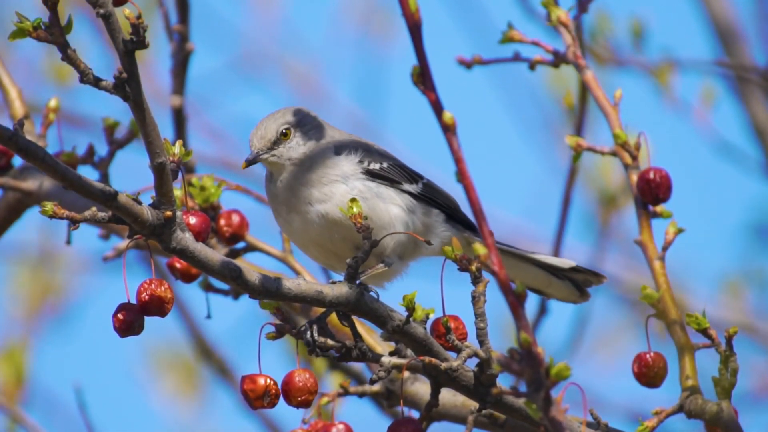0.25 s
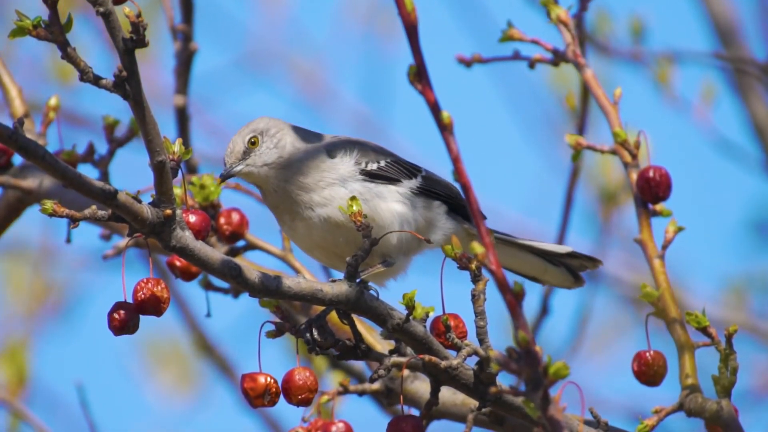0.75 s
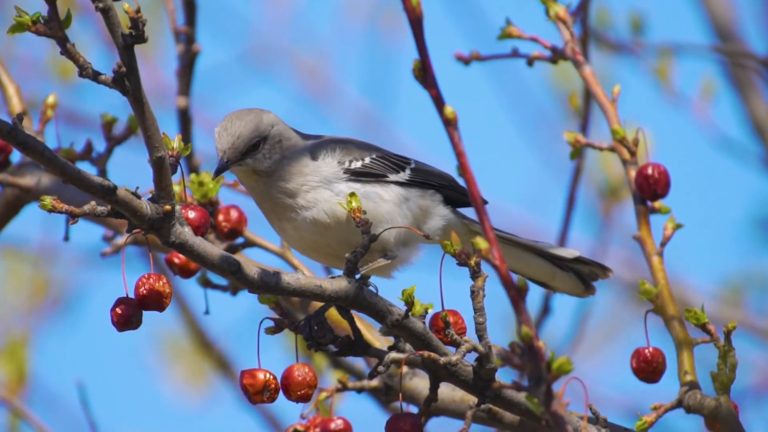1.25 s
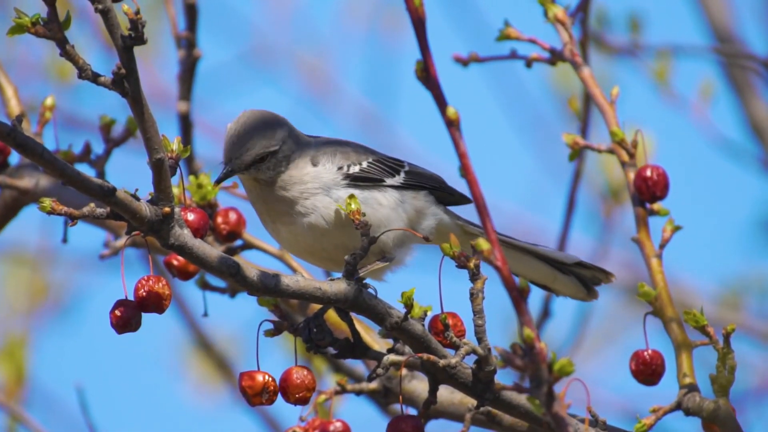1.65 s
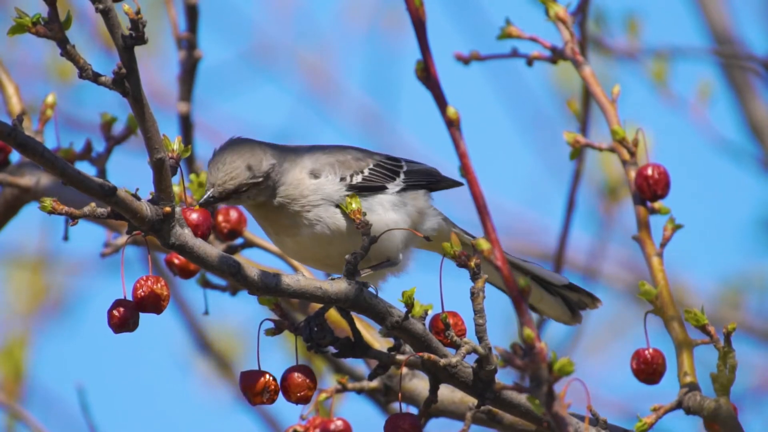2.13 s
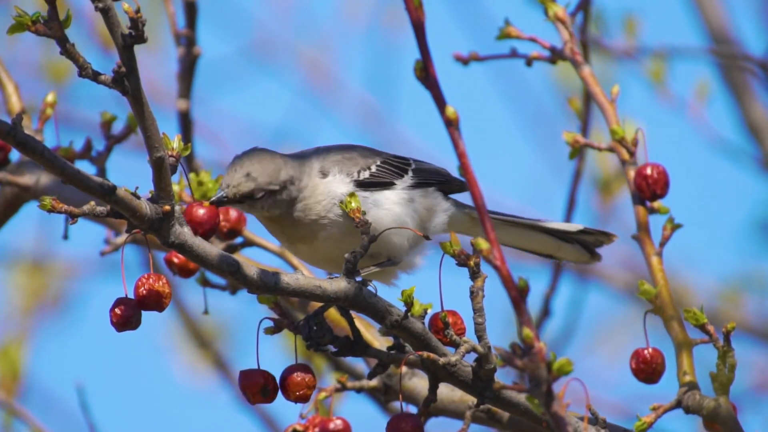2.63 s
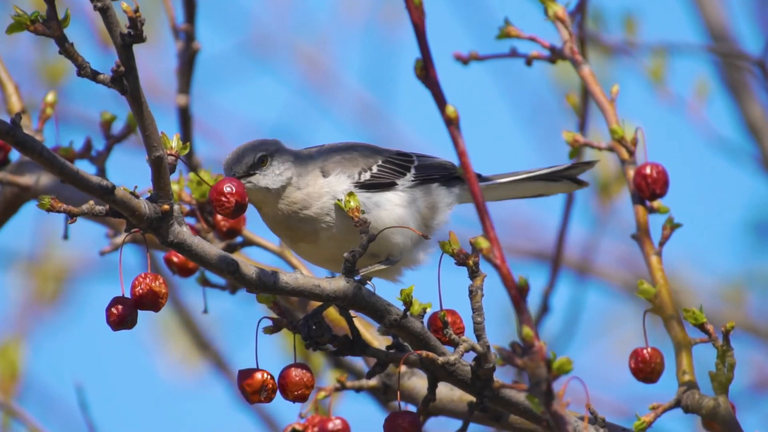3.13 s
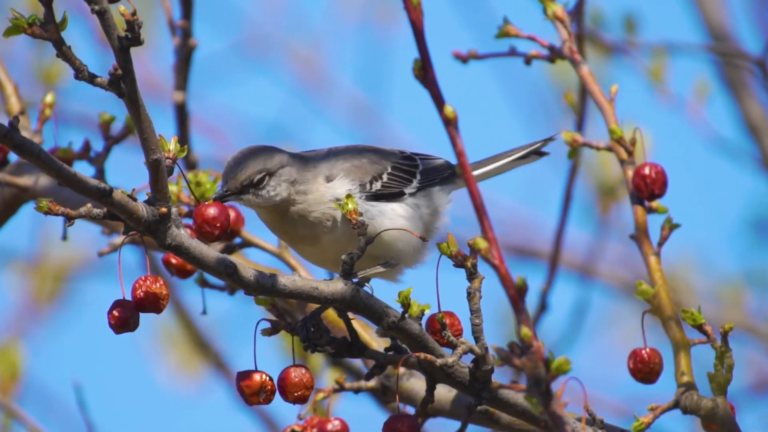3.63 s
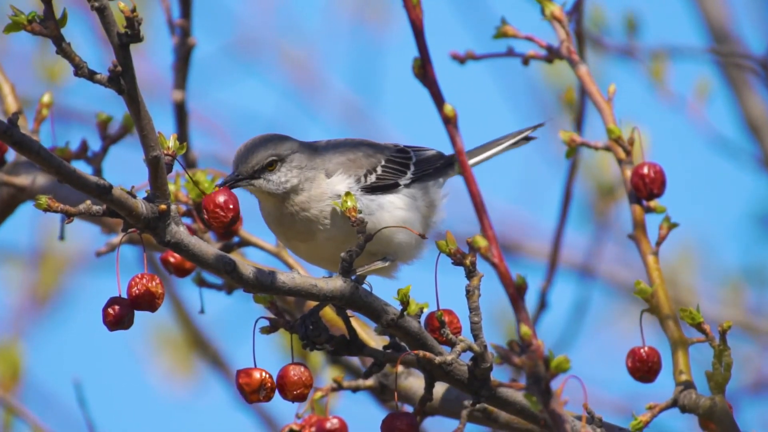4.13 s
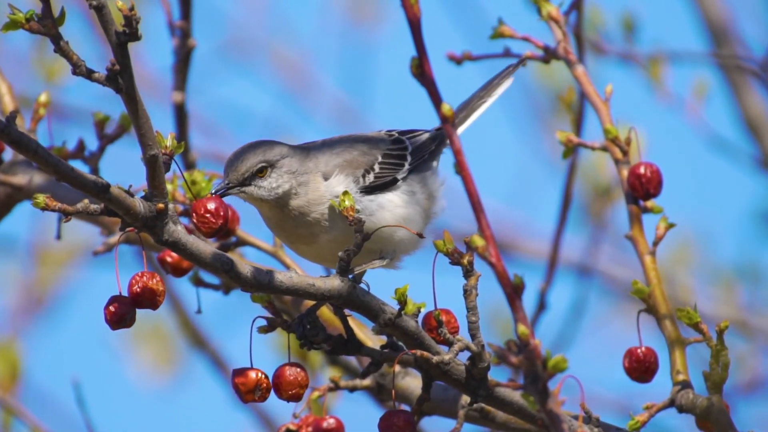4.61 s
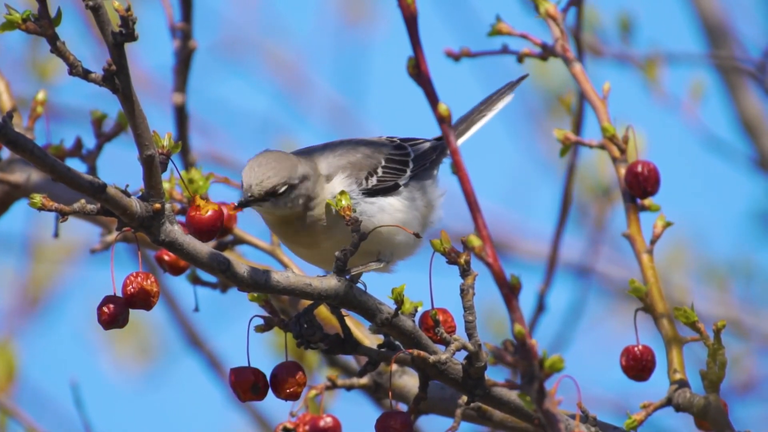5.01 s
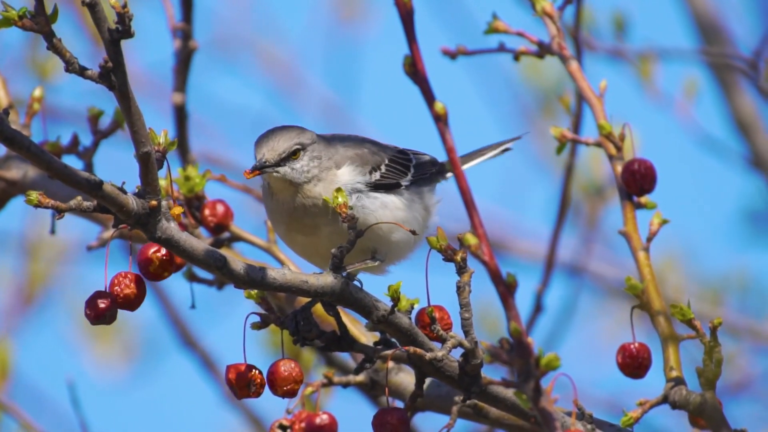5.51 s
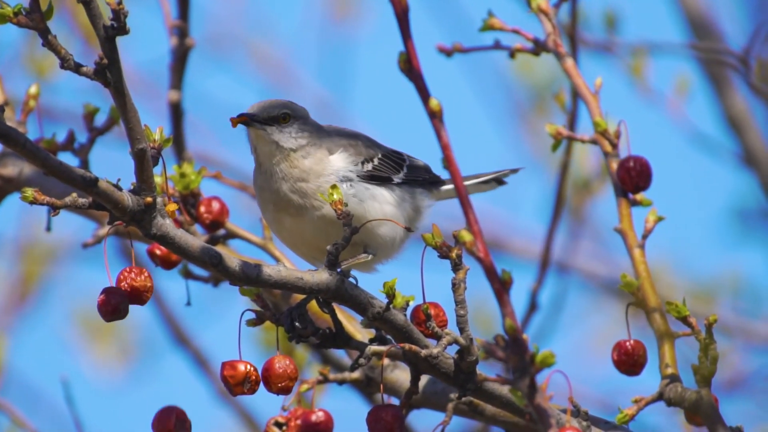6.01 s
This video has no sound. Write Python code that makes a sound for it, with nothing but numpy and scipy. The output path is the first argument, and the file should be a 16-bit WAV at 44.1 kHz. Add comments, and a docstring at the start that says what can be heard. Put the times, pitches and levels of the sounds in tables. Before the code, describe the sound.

A mockingbird sings close by outdoors, loud and clear, with a light echo from the trees. It opens with two lower slurred notes and a sharp chip, pauses, then repeats that figure five times from about 1.1 to 2.5 seconds. From 3.1 to 3.8 seconds it gives four quick pairs of falling slurs, the second of each pair shorter and higher. Five fast, peaked, slightly rough whistles follow from 4.3 to 4.9 seconds, and six more from 5.4 to 6.1. Throughout, insects trill high and steady over a soft outdoor hush. Further off, an animal gives one short, low, falling cluck a little more than once a second. Small birds add thin, very high calls, clearest near 1, 3.9 and 4.3 seconds. Faint, distant taps on wood, about five a second, come from 0.8 to 2.8 seconds and twice more near 5.7.

```python
"""A close mockingbird repeats two low slurs and a sharp chip, then paired down-slurs, then peaked whistles.
Each note is a near-sine with faint overtones, its pitch set by syrinx tension; ground and trees echo it.
Insects trill with their wings over a soft outdoor hush. An animal clucks further off, small birds give
thin high calls, and something wooden is tapped far away."""
import sys
import numpy as np
from scipy import signal
from scipy.fft import rfft, irfft
from scipy.io import wavfile

SR = 44100
rng = np.random.default_rng(int(sys.argv[2]) if len(sys.argv) > 2 else 0)


def generate_wav(signal):
    """Clip the signal to [-1, 1] and save it as 16-bit WAV at the path in sys.argv[1]."""
    frames = np.transpose(np.atleast_2d(signal))
    scaled = np.clip(frames, -1, 1) * 32767
    pcm = np.round(scaled).astype(np.int16)
    wavfile.write(sys.argv[1], SR, pcm)


N = 276066


def from_db(db):
    """Decibels to gain."""
    return 10 ** (np.asarray(db) / 20)


def rms_one(x):
    """Scale to rms 1."""
    return x / np.sqrt(np.mean(x ** 2) + 1e-20)


def at_hz(points, hz):
    """Interpolate (hz, value) points on a log-frequency axis."""
    points = np.array(points)
    return np.interp(np.log(hz), np.log(points[:, 0]), points[:, 1])


def band(x, low_hz, high_hz):
    """Butterworth band-pass."""
    sos = signal.butter(2, [low_hz, min(high_hz, SR / 2 - 1)], "band", fs=SR, output="sos")
    return signal.sosfilt(sos, x + 1e-18)


def drift(rate_hz, size):
    """Smooth random wander, rms 1."""
    pole = np.exp(-2 * np.pi * rate_hz / SR)
    return rms_one(signal.lfilter([1], [1, -2 * pole, pole * pole], rng.standard_normal(2 * size))[size:])


def clock(length_s):
    """Seconds since note onset."""
    return np.arange(int(length_s * SR)) / SR


def add(track, start_s, sound):
    """Mix a sound into a track, trimmed at both ends."""
    at = round(start_s * SR) + np.arange(len(sound))
    inside = (at >= 0) & (at < N)
    track[at[inside]] += sound[inside]


def widen(pair, correlation):
    """Two independent signals to left and right with a given correlation."""
    mid = np.sqrt((1 + correlation) / 2) * pair[0]
    side = np.sqrt((1 - correlation) / 2) * pair[1]
    return np.stack([mid + side, mid - side])


def pan(x, left_db):
    """Place a sound by level difference."""
    return x * from_db([[left_db / 2], [-left_db / 2]])


def trees(x, t60_s, correlation):
    """Scatter from trunks and leaves: a stereo tail that swells briefly and dies."""
    t = clock(1)
    tail = rng.standard_normal((2, SR)) * from_db(-60 * t / t60_s) * (1 - np.exp(-t / 0.0022))
    tail = widen(tail / np.sqrt(np.sum(tail[0] ** 2)), correlation)
    return signal.fftconvolve(x[None], tail, axes=1)[:, :N]


def swell(t, attack_s, release_s):
    """Note envelope: rounded attack and release."""
    rise = np.sin(np.pi / 2 * np.minimum(t / attack_s, 1))
    fall = np.sin(np.pi / 2 * np.minimum((t[-1] - t) / release_s, 1))
    return rise * fall


def swing(t, high_hz, low_hz, crest, trough):
    """Cosine swing of tension; crest and trough are shares of the note, negative before onset."""
    angle = np.pi * (t / t[-1] - crest) / (trough - crest)
    return low_hz + (high_hz - low_hz) * (1 + np.cos(angle)) / 2


def droop(t, share, fall_s=0.0049):
    """Pitch factor: falls by a share as the air gives out at the end of a note."""
    return 1 - share * np.exp((t - t[-1]) / fall_s)


def hiss(size, db_per_octave):
    """Airy hiss that rides on the bird's notes, tilted; rms 1."""
    # Hiss spectrum: frequency_hz, relative_density_db
    spectrum = [(200, -68), (1500, -22), (3000, 16), (4000, 7), (6500, 4), (8500, -6), (11000, -2),
                (14500, -1), (16000, -9)]
    hz = np.fft.rfftfreq(size, 1 / SR) + 1
    gain = from_db(at_hz(spectrum, hz) + db_per_octave * np.log2(hz))
    return rms_one(irfft(rfft(rng.standard_normal(size)) * gain, size))


def sing(hz, partials=(), bright_db=0, waver=0.0074, rasp=.002,
         hiss_db=-70, hiss_db_per_octave=0, rough_from=0):
    """Wavering tone with partials (multiple, level_db); rasp and hiss enter at note share rough_from."""
    throat_hz, throat_width_hz, throat_peak_db = 11300, 290, 4   # resonance lifts passing overtones
    size = len(hz)
    rough = np.clip((np.linspace(0, 1, size) - rough_from) * 10, 0, 1)
    jitter = waver * drift(190, size) + rasp * rough * drift(690, size)
    phase = 2 * np.pi * np.cumsum(hz * (1 + jitter)) / SR
    tone = np.sin(phase) + from_db(hiss_db + bright_db) * rough * hiss(size, hiss_db_per_octave)
    for k, partial_db in partials:
        flicker_db = 3 * drift(50, size)
        throat_db = throat_peak_db / (1 + ((k * hz - throat_hz) / throat_width_hz) ** 2)
        gain = from_db(partial_db + bright_db + throat_db + flicker_db)
        tone += gain * (k * hz < SR / 2) * np.sin(k * phase)
    return np.sqrt(2) * tone


def glides(notes, voice, trough, attack_s, release_s, droop_share, half_partial=False, **texture):
    """Slurred notes: each is one swing of tension under one swell of air."""
    half_db, half_fade_db_per_s = -22, 10.5   # partial at 1.5 x pitch, fading over the phrase
    out = np.zeros(N)
    for start_s, length_s, high_hz, low_hz, crest, level_db, bright_db in notes:
        t, partials = clock(length_s), list(enumerate(voice, 2))
        if half_partial:
            partials.append((1.5, half_db - half_fade_db_per_s * start_s - bright_db))
        hz = swing(t, high_hz, low_hz, crest, trough) * droop(t, droop_share)
        tone = sing(hz, partials, bright_db, **texture)
        add(out, start_s, from_db(level_db) * swell(t, attack_s, release_s) * tone)
    return out


def mockingbird():
    """Three phrases among trees; close echoes beat against each glide and flutter its level."""
    # Reflections from branches, ground and far trunks: delay_s, gain_db
    echoes = [(.0034, -20.5), (.0063, -23.5), (.0085, -17.5), (.0099, -20), (0.0128, -19), (.0245, -24.5),
              (.041, -40.5), (.085, -38.5)]
    song = chip_phrase() + slur_phrase() + whistle_phrase() + leaps()
    heard = song.copy()
    for delay_s, gain_db in echoes:
        add(heard, delay_s, from_db(gain_db) * song)
    return heard + from_db(-26.5) * trees(song, t60_s=0.52, correlation=1)


def chip_phrase():
    """Two joined low notes and a chip; the syrinx's second side adds a rough drop under most chips."""
    # First, second and closing notes: start_s, length_s, high_hz, low_hz, crest_share, level_db, bright_db
    arches = [(-0.035, 0.065, 2270, 1989, 0.29, -17.5, 2.5), (1.117, 0.057, 2303, 2062, 0.3, -14.5, -10),
              (1.402, 0.065, 2186, 1986, 0.18, -18, 1), (1.703, 0.066, 2230.0, 1974, 0.29, -18.5, 4.5),
              (2.002, 0.069, 2275, 2017, 0.236, -15.5, 4.0), (2.297, 0.061, 2270.0, 1990.0, 0.15, -17.5, 4)]
    slurs = [(0.015, 0.073, 2483, 2022, -0.16, -17, -2.5), (1.169, 0.067, 2484, 2105, 0.13, -17.5, -1.5),
             (1.458, 0.065, 2342, 2043, 0.012, -19.0, 1), (1.765, 0.066, 2570, 2098, -0.22, -17, 2.5),
             (2.063, 0.072, 2633, 2115, -0.245, -16, 2), (2.353, 0.066, 2554, 2073, -0.0039, -17.5, 4.5)]
    chips = [(0.134, 0.044, 3210.0, 3016, -0.12, -13.5, -3), (1.279, 0.037, 3280, 2963, -0.43, -12.5, -3.5),
             (1.563, 0.04, 3150, 2875, -0.155, -14, -0.5), (1.875, 0.038, 3413, 3006, 0.065, -13.5, -5.5),
             (2.176, 0.043, 3410, 2810, -0.044, -11, -4), (2.453, 0.038, 3507, 2928, -0.15, -12.5, -1.5)]
    # Second-side drops: start_s, length_s, level_db
    drops = [(.164, 0.036, -24.5), (1.304, 0.033, -23.5), (1.587, 0.048, -21), (1.904, .040, -19.5),
             (2.482, 0.036, -18.5)]
    # Harmonics 2 to 7: relative_db
    low_voice = [-34, -39, -38, -36.5, -37.5, -35]
    chip_voice = [-32.5, -30.5, -32, -38, -37, -35]
    out = glides(arches, low_voice, trough=.85, attack_s=0.036, release_s=0.032, droop_share=.05,
                 half_partial=True, rasp=0.0016, hiss_db=-34, hiss_db_per_octave=4.5, rough_from=.45)
    out += glides(slurs, low_voice, trough=.78, attack_s=0.024, release_s=0.041, droop_share=0.092,
                  half_partial=True, rasp=0.006, hiss_db=-34, hiss_db_per_octave=9)
    out += glides(chips, chip_voice, trough=0.835, attack_s=0.012, release_s=0.024, droop_share=0.074,
                  rasp=0.011, hiss_db=-31, rough_from=.45)
    for start_s, length_s, level_db in drops:
        t = clock(length_s)
        hz = swing(t, high_hz=2557, low_hz=1657, crest=-0.179, trough=0.91)
        fade_db = 22.5 * t / length_s
        envelope = from_db(level_db - fade_db) * swell(t, attack_s=0.015, release_s=.003)
        add(out, start_s, envelope * sing(hz, rasp=0.02, hiss_db=-15.5))
    return out


def insects():
    """Each wing stroke is a short tone that sags as the wing slows; distant insects merge into hiss."""
    # Trills: strokes_per_s, start_hz, end_hz, length_s, level_db
    trills = [(45.2, 6266, 5900, 0.01245, -41), (48.8, 7350, 6300, 0.014, -48.5),
              (65.6, 5700, 4860, .008, -48)]
    # Distant chorus bands: centre_hz, width_hz, level_db
    chorus_bands = [(5146, 360, -54.5), (5820, 1300, -52.5), (6480, 2100, -59.5), (7174, 490, -52)]
    strokes, chorus = np.zeros(N), np.zeros((2, N))
    for per_s, start_hz, end_hz, length_s, level_db in trills:
        progress = np.linspace(0, 1, int(length_s * SR))
        envelope = np.sin(np.pi * progress ** .8)
        draws = rng.standard_normal((int(per_s * N / SR) + 1, 4))
        for k, (late, loud, sharp, miss) in enumerate(draws):
            hz = (start_hz + (end_hz - start_hz) * progress ** 3) * (1 + .004 * sharp)
            gain = from_db(level_db + 1.5 * loud) * (miss < 1.3)   # about one in ten skipped
            tone = np.sin(2 * np.pi * np.cumsum(hz) / SR)
            add(strokes, k / per_s + .0005 * late, gain * envelope * tone)
    for centre_hz, width_hz, level_db in chorus_bands:
        noise = band(rng.standard_normal((2, N)), centre_hz - width_hz / 2, centre_hz + width_hz / 2)
        chorus += from_db(level_db) * rms_one(noise)
    scatter = from_db(-8) * trees(strokes, t60_s=.3, correlation=0)
    left = np.interp(np.arange(N) - 1.2, np.arange(N), strokes)   # 1.2 samples late
    return np.stack([left, strokes]) + scatter + widen(chorus, correlation=.05)


def hush(level_db=-50):
    """Far air and leaves: half-octave noise bands, the low mids leaning right."""
    # Hush spectrum: frequency_hz, relative_density_db
    spectrum = [(40, -44), (110, -26.5), (180, -28.5), (250, -9), (340, 0), (550, -2), (800, -2.5),
                (1200, -5.5), (2000, -8.5), (4000, -9), (7500, -18), (9500, -17.5), (15000, -19)]
    # Left-right likeness: frequency_hz, correlation
    likeness = [(60, .95), (250, 0.72), (700, 0.42), (2000, 0.46), (6000, 0.75), (14000, 0.13)]
    edges_hz = 30 * 2 ** np.arange(0, 9.6, .5)
    white = rng.standard_normal((2, 2, N))
    out = np.zeros((2, N))
    for k, (low_hz, high_hz) in enumerate(zip(edges_hz, edges_hz[1:])):
        hz = np.sqrt(low_hz * high_hz)
        noise = widen(band(white[k % 2], low_hz, high_hz), at_hz(likeness, hz))
        out += pan(from_db(at_hz(spectrum, hz)) * noise, left_db=-3 if 200 < hz < 1500 else -.3)
    return from_db(level_db) * rms_one(out)


def clucks(length_s=0.0149, high_hz=1480, low_hz=996):
    """An animal further off repeats one short, low, falling note."""
    # Clucks: start_s, level_db
    calls = [(.095, -32), (.731, -32), (1.709, -32.5), (2.571, -33), (3.17, -32.5), (4.249, -32),
             (5.079, -32.5), (5.868, -30)]
    out, t = np.zeros(N), clock(length_s)
    hz = np.linspace(high_hz, low_hz, len(t))
    envelope = swell(t, attack_s=0.016, release_s=0.0081)
    for start_s, level_db in calls:
        add(out, start_s, from_db(level_db) * envelope * sing(hz, rasp=.012))
    return out + from_db(-5) * trees(out, t60_s=0.72, correlation=0.71)


def small_birds(settle_share=0.302, octave_db=-25):
    """Thin high calls that slide, then settle; the far ones are mostly scatter."""
    # Calls: start_s, length_s, start_hz, end_hz, level_db, scatter_to_direct_db
    seeps = [(0.362, 0.033, 10040, 7730, -44.5, 7), (.59, 0.058, 8200, 7600, -55, -1),
             (.665, 0.084, 9740, 9500, -65, 2), (0.986, 0.038, 8620, 7370, -25, -4),
             (1.48, .045, 9900, 8070, -52, 8), (2.718, 0.056, 7230, 8180, -45, 1),
             (3.614, .07, 7260, 7690, -47, 8.5), (3.915, 0.049, 7700, 7020, -34, -4),
             (4.17, .06, 8000, 7700, -57, 0), (4.349, 0.05, 7220, 7560, -34, 0.5),
             (4.977, 0.04, 8900, 8100, -54, -8)]
    direct, scattered = np.zeros((2, N))
    for start_s, length_s, start_hz, end_hz, level_db, scatter_db in seeps:
        t = clock(length_s)
        hz = end_hz + (start_hz - end_hz) * np.exp(-t / (settle_share * length_s))
        tone = sing(hz, [(2, octave_db)], waver=0.0065, rasp=0.0038)
        call = from_db(level_db) * swell(t, attack_s=0.018, release_s=0.026) * tone
        add(direct, start_s, call)
        add(scattered, start_s, from_db(scatter_db) * call)
    return direct + trees(scattered, t60_s=0.35, correlation=.2)


def knocks(ring_hz=790, t60_s=0.046, attack_s=0.0012):
    """Wood tapped far off, in runs of about five a second; one mode carries."""
    # Taps: start_s, level_db
    taps = [(.833, -40), (.995, -37), (1.379, -36.5), (1.564, -35.5), (1.761, -37), (1.962, -36.5),
            (2.156, -39.5), (2.360, -41.5), (2.565, -42), (2.758, -39), (5.606, -43.5), (5.805, -45)]
    out, t = np.zeros(N), clock(.25)
    ring = np.sin(2 * np.pi * ring_hz * t) * from_db(-60 * t / t60_s) * (1 - np.exp(-t / attack_s))
    for start_s, level_db in taps:
        add(out, start_s, from_db(level_db) * ring)
    return out + from_db(-9) * trees(out, t60_s=0.41, correlation=.5)


def leaps(length_s=.013, from_hz=2300):
    """The syrinx tightens ever faster on its way up to a high note, sounding softly."""
    # Upward leaps: start_s, top_hz, level_db
    rises = [(2.161, 4240, -38), (3.184, 3720, -27.5), (3.352, 3960, -25), (3.528, 3900, -33),
             (3.703, 3660, -27)]
    out, t = np.zeros(N), clock(length_s)
    for start_s, top_hz, level_db in rises:
        hz = from_hz + (top_hz - from_hz) * (t / length_s) ** 2
        add(out, start_s, from_db(level_db) * swell(t, attack_s=0.0061, release_s=0.001) * sing(hz))
    return out


def slur_phrase():
    """Pairs of down-slurs: one long, one short and high."""
    # Long and short slurs: start_s, length_s, high_hz, low_hz, crest_share, level_db, bright_db
    swoops = [(3.122, 0.063, 3054, 2392, -0.026, -12.5, 1), (3.284, 0.077, 3170, 2285, -0.57, -14, -2.5),
              (3.462, 0.063, 3300.0, 2314, -0.29, -12, -0.5), (3.633, 0.072, 2913, 2304, 0.13, -14, -0.5)]
    flicks = [(3.193, 0.049, 3985, 2955, -0.43, -11, -2), (3.36, 0.049, 3890, 2860, -0.3, -11.5, -1.5),
              (3.537, 0.048, 3915, 2946, -0.21, -11.5, -1.5), (3.713, 0.048, 3650, 2940, 0.01, -10.5, -3)]
    # Harmonics 2 to 7: relative_db
    voice = [-27, -33.5, -38, -38, -34, -50]
    out = glides(swoops, voice, trough=.94, attack_s=0.028, release_s=0.056, droop_share=0.082,
                 rasp=0.0013, hiss_db=-56)
    out += glides(flicks, voice, trough=0.84, attack_s=0.026, release_s=0.029, droop_share=0.056,
                  rasp=0.0032, hiss_db=-35)
    return out


def whistle_phrase(peak_width_s=.0038, sag_s=0.0185, push_db=2.9):
    """A held pitch spikes, then sags below its start, louder and rougher as the bird pushes harder."""
    # Whistles: start_s, length_s, held_hz, peak_hz, time_to_peak_s, sag_hz, level_db, bright_db
    whistles = [(4.335, 0.075, 2998, 4210, 0.042, 534, -15, 2),
                (4.453, 0.077, 2988, 3886, .043, 520, -15, 1),
                (4.564, .079, 3010, 3870, 0.044, 384, -15, 1),
                (4.677, 0.083, 3087, 3860, .045, 420, -15, 1),
                (4.796, 0.073, 2964, 4040, 0.041, 493, -15, 0.5),
                (5.418, .08, 3064, 3765, .043, 436, -15.5, 0), (5.538, 0.08, 3000, 3780, .045, 394, -16, 1),
                (5.652, 0.083, 3003, 3556, .048, 373, -14.5, 0),
                (5.784, .083, 3006, 3940, 0.045, 360, -16.5, 2),
                (5.913, 0.082, 3044, 4040, 0.044, 396, -16, 0.5),
                (6.032, 0.087, 2983, 3835, .047, 430, -15.5, 1)]
    # Harmonics 2 to 7: relative_db
    voice = [-30, -37, -44, -51, -51, -49]
    out = np.zeros(N)
    for start_s, length_s, held_hz, peak_hz, peak_s, sag_hz, level_db, bright_db in whistles:
        t = clock(length_s)
        spike = np.exp(-abs(t - peak_s) / peak_width_s)
        sag = 1 - np.exp(-np.maximum(t - peak_s, 0) / sag_s)
        hz = (held_hz + (peak_hz - held_hz) * spike - sag_hz * sag) * droop(t, share=0.063)
        tone = sing(hz, enumerate(voice, 2), bright_db, rasp=0.011, hiss_db=-28.5,
                    hiss_db_per_octave=-1.5, rough_from=0.93 * peak_s / length_s)
        envelope = from_db(level_db + push_db * sag) * swell(t, attack_s=0.022, release_s=0.024)
        add(out, start_s, envelope * tone)
    return out


def scene():
    """The singer in front, everything else behind."""
    return mockingbird() + clucks() + small_birds() + knocks() + insects() + hush()


def record(dry):
    """Steep low-pass."""
    cutoff_hz = 15200
    return signal.sosfilt(signal.ellip(10, .2, 80, cutoff_hz, fs=SR, output="sos"), dry)


dry = scene()
out = record(dry)
generate_wav(out)
```